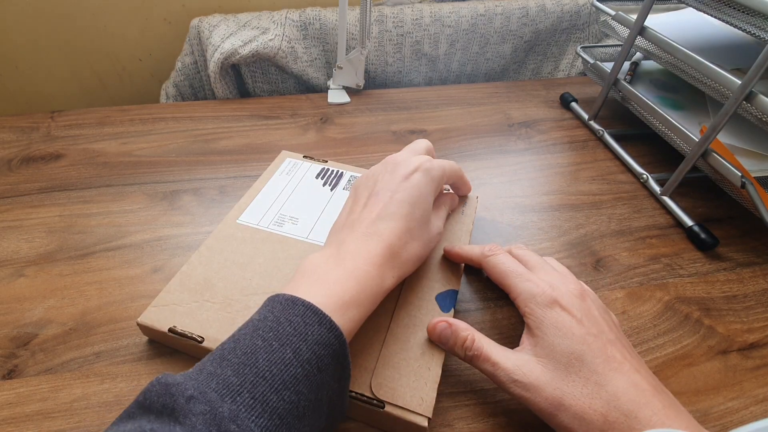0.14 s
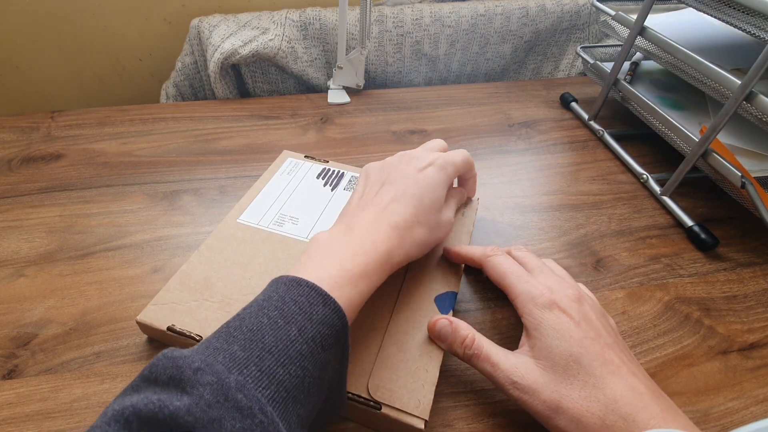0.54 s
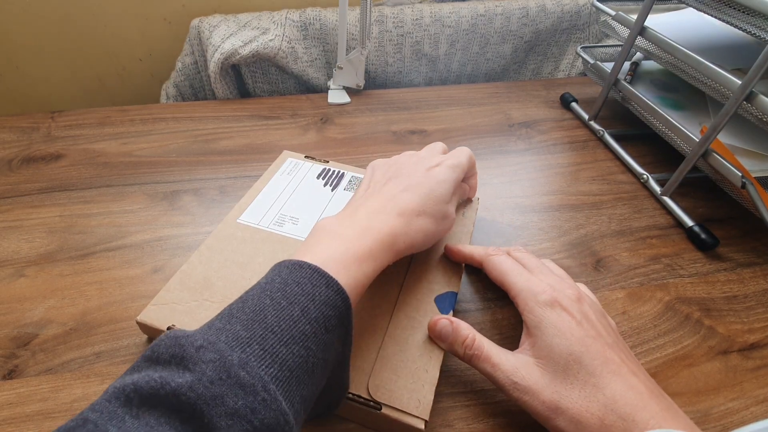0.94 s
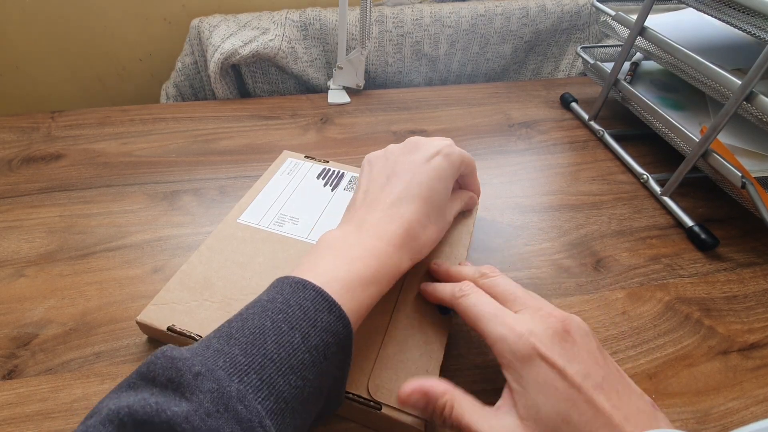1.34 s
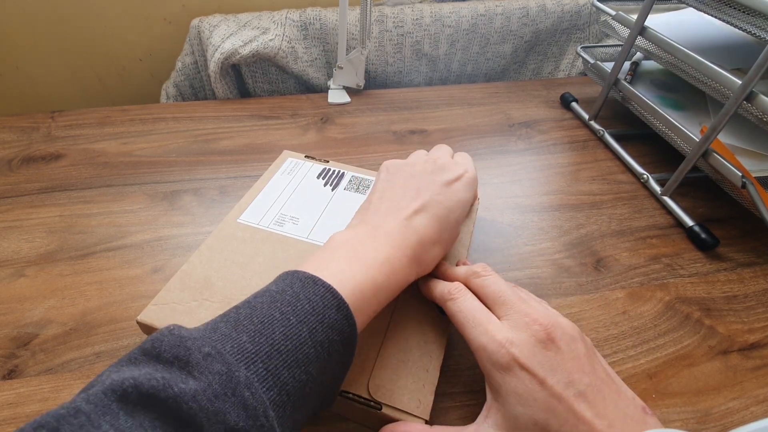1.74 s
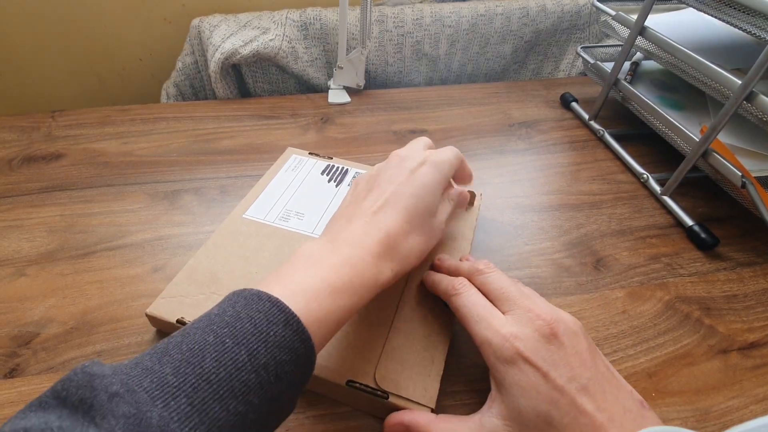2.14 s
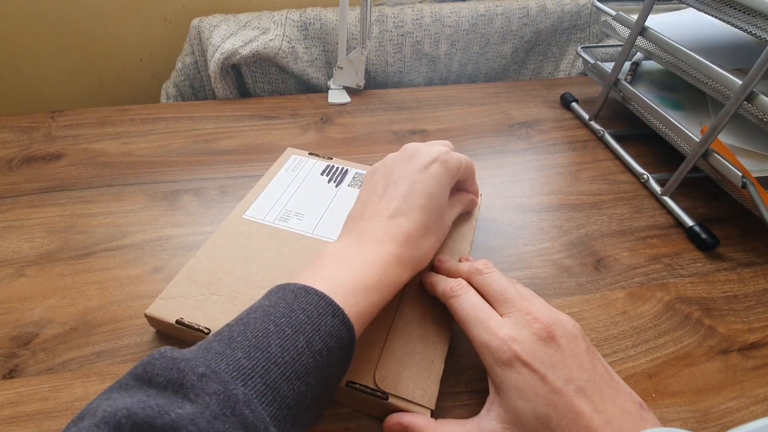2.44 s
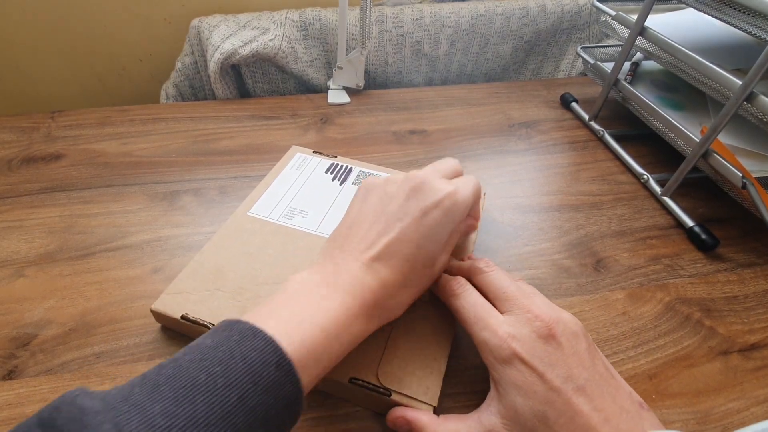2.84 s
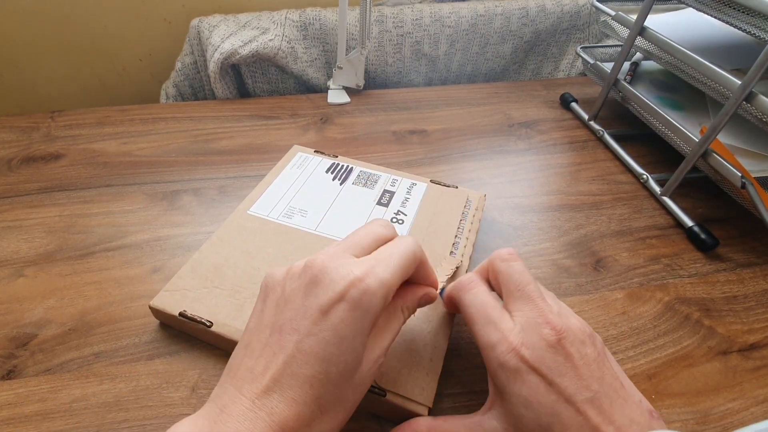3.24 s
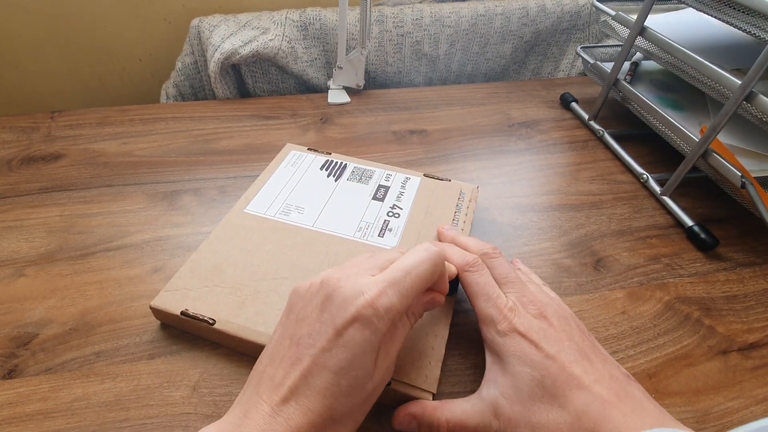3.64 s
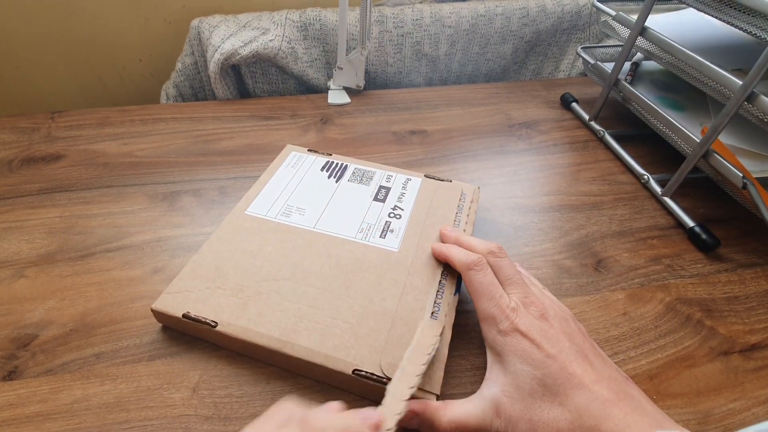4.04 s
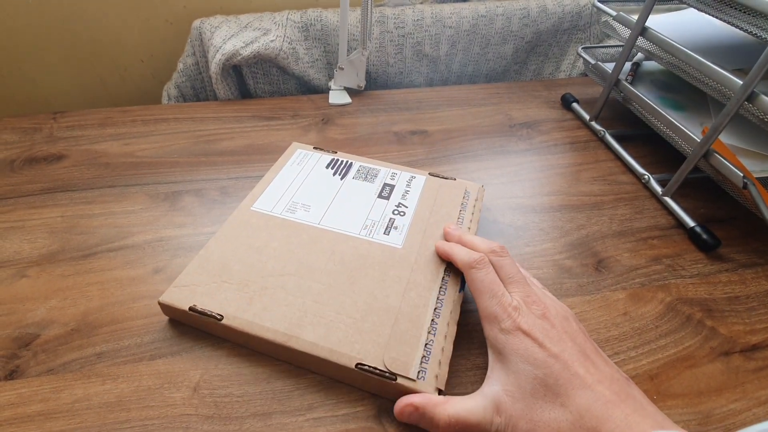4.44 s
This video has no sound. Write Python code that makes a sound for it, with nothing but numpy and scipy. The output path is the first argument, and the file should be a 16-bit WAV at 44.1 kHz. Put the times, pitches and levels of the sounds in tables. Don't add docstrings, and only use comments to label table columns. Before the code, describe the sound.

Close stereo pickup in a small soft room with faint hiss and hum. A thin airy finger slide on paper, then sparse nail ticks, scuffs and soft hollow taps on a cardboard mailer. A sudden rapid ripping burst follows, then a quieter rustling regrip, and a second, louder rip of crunchy snaps with low desk knocks, ending in near silence.

```python
import sys
import numpy as np
from scipy import signal
from scipy.fft import rfft, irfft, next_fast_len
from scipy.io import wavfile
from scipy.ndimage import uniform_filter1d

SR = 44100
rng = np.random.default_rng(int(sys.argv[2]) if len(sys.argv) > 2 else 0)


def generate_wav(sig):
    pcm = np.round(np.clip(np.atleast_2d(sig).T, -1, 1) * 32767).astype(np.int16)
    wavfile.write(sys.argv[1], SR, pcm)


def boost_factor(decibels):
    exponent = np.asarray(decibels, float) / 20
    return 10 ** exponent


N = 202727
T = np.arange(N) / SR
FIRST_PULL = (T > 2.72) & (T < 3.2)
SECOND_PULL = T > 3.82
PULLING = FIRST_PULL | SECOND_PULL
LEAD_S = 0.012

# t/s, strength/dB, hollow's extra answer/dB, paper skin's extra/dB, cluster length/s
PULL_1 = [(2.749, -32, 0.5, -4.5, 0.014), (2.79, -25.5, -7, -14, 0.0064), (2.796, -31, 0, 1.5, 0.004),
          (2.835, -30, -2, -2, 0.017), (2.87, -18.5, -2, -6, 0.0049), (2.921, -30, 8, 3, 0.0085),
          (2.949, -32, 8, -6, 0.0069), (2.985, -27.5, -7, 2, 0.0058), (3.007, -20, -18, -7, 0.0061),
          (3.036, -22.5, 0, -5.5, 0.011), (3.057, -31, -9, -23, 0.0038), (3.082, -23, 4, -1.5, 0.007),
          (3.091, -17, -32, -12.5, 0.0023), (3.107, -20, -10, -16, 0.0024), (3.132, -19, -8, -7.5, 0.0091)]
PULL_2 = [(3.834, -28.5, -11, 5.5, 0.0066), (3.858, -31, -22, 1.5, .0064), (3.886, -22.5, -33, 2, 0.0056),
          (3.915, -34, 1, 9, 0.0031), (3.963, -17.5, -17, 1.5, 0.0048), (4.006, -18, -18, 1.5, 0.006),
          (4.048, -14, -2, -2.5, 0.007), (4.084, -12.5, 0.5, -4, 0.0052), (4.113, -16, 2, -4, 0.007),
          (4.149, -10.5, -8, -6.5, 0.0041), (4.179, -14.5, -12, -2.5, 0.0075),
          (4.187, -20.5, -9, -6, 0.0034), (4.214, -11, 1.5, -8, 0.0041), (4.228, -22, -1.5, -2, .005),
          (4.242, -16, 1, 0, 0.0054), (4.264, -15, -13, -8, 0.011), (4.277, -12.5, -1, -10, 0.0028)]
# t/s, strength/dB, hollow's extra/dB, skin's extra/dB, tab pitch f/Hz
PICKS = [(.384, -68, 20.5, 1, 1640), (.496, -57.5, 13.5, -5, 4170), (0.617, -64, -12, 5.5, 3550),
         (.641, -42, -31, -8, 3400), (0.661, -47, -25, -5, 3400), (1.03, -59.5, -22, -6, 5000),
         (1.065, -46.5, -30, -12, 1900), (1.311, -49, 3.5, -17, 3600), (1.46, -60, 15, -14, 3420),
         (1.619, -49.5, -25, -19, 3200), (1.651, -46, 4, -2, 3100), (1.707, -52, 18, -10, 1800),
         (1.745, -68.5, 34.5, -3, 1730), (1.763, -52, 3, 0, 2900), (1.794, -56, -20, 2, 3010),
         (1.832, -59, -20, 1, 4500), (1.898, -31, -5.5, 1, 2420), (1.98, -51, -18, -6, 3000),
         (2.032, -39, -7, -9, 2020), (2.06, -50, -1, -14, 1890), (2.103, -62, 16, -11, 3380),
         (2.254, -66, 2, -20, 1700), (2.313, -47.5, -2, 2.5, 4400), (2.364, -51, 5, -3, 1740),
         (2.508, -69, 35, -4, 1680), (2.62, -61.5, 11, -3, 1600)]
TUGS = [
    (2.713, -44.5, -4, 2.5, 4130),
    (3.588, -45.5, -3, -9.5, 1460),
    (3.693, -58, -23, 9, 1410),
    (3.794, -57, -1, 12, 1530),
    (4.567, -59.5, 3.5, -13, 6500),
    (4.575, -65, 22, -6, 1290),
    (3.75, -66, -5, 6, 3000),
]
# f/Hz, width/Hz, level/dB
DESK_MODES = [(121.2, 32.5, -1), (150, 35, -1.5), (258.4, 27, -3.5), (393, 230, -3)]

# t/s, strength/dB, extra of each part/dB, cluster length/s
PICK_BREAKS = [(s, db, dict(panel=0, hollow=depth, fizz=fray), 0.0018) for s, db, depth, fray, _ in PICKS + TUGS]
PULL_1_BREAKS, PULL_2_BREAKS = (
    [(s, db, dict(panel=0, hollow=depth, fizz=fray), run) for s, db, depth, fray, run in pull]
    for pull in (PULL_1, PULL_2))


def evened(x):
    return x / np.sqrt(np.mean(x ** 2) + 1e-20)


def read(points, hz):
    f, value = np.transpose(points)
    return np.interp(np.log(hz + 1), np.log(f + 1), value)


def shaped(x, points, factor=1.):
    size = next_fast_len(N)
    gain = boost_factor(factor * read(points, np.fft.rfftfreq(size, 1 / SR)))
    return irfft(rfft(x, size) * gain, size)[:, :N]


def pair(x, like):
    like = np.clip(like, 0, 1)
    return np.array([x[0], like * x[0] + np.sqrt(1 - like ** 2) * x[1]])


def resonate(x, hz, width):
    turn = np.exp(2j * np.pi * np.cumsum(hz * np.ones(x.shape[1])) / SR)
    r = np.exp(-np.pi * width / SR)
    low = signal.lfilter([1 - r], [1, -r], x / turn)
    low = signal.lfilter([1 - r], [1, -r], low)
    return evened((turn * low).real)


def air():
    # f/Hz, level/dB
    hiss_curve = [(24, -40), (40, -14), (392, 0), (770, -10), (1850, -25), (7000, -29), (16000, -45)]
    # f/Hz, width/Hz, level/dB
    hum_lines = [(198.1, 6.7, -70.5), (368, 5.5, -74.5), (6860, 600, -85.5), (12900, 150, -100)]
    # t/s, level/dB
    gate_curve = [
        (0, 4),
        (.6, -3),
        (.85, -4.5),
        (1.05, -1),
        (2.4, 0.5),
        (4.35, 0.5),
        (4.5, -8),
    ]
    hiss = evened(shaped(pair(rng.standard_normal((2, N)), 0.42), hiss_curve)) * boost_factor(-66.5)
    drone = np.zeros((2, N))
    for hz, width_hz, db in hum_lines:
        tone = 0.04 * np.cos(2 * np.pi * hz * T)
        drone += boost_factor(db) * resonate(pair(rng.standard_normal((2, N)), 0.94) + tone, hz, width_hz)
    return (hiss + drone) * boost_factor(np.interp(T, *np.transpose(gate_curve)))


def arms_db():
    # t/s, level/dB
    shaking = [(0.0, -66), (1.24, -87.5), (1.33, -64), (1.88, -67.5), (1.9, -55.5), (2.22, -72),
               (2.71, -77.5), (2.8, -42), (2.95, -54), (3.16, -43), (3.26, -64), (3.82, -71), (3.86, -42.5),
               (4.0, -59.5), (4.05, -47.5), (4.23, -56), (4.26, -45), (4.59, -99)]
    return np.interp(T, *np.transpose(shaking))


def rumble():
    noise = pair(rng.standard_normal((2, N)), 0.96)
    return resonate(noise, hz=49.0, width=29) * boost_factor(1.5 + arms_db())


def slide():
    # f follows t; t/s, f/Hz, level/dB
    glide = [
        (0, 14200, -66.5),
        (.07, 14500, -58.5),
        (.16, 13600, -59.5),
        (.19, 12900, -65),
        (.24, 13900, -66),
        (.3, 11900, -65.5),
        (.38, 9600, -77),
        (.41, 9000, -90),
    ]
    # f/Hz, width/Hz, level over the whistle/dB
    skin_bands = [(3900, 360, -22), (4800, 430, -16), (6720, 620, -9)]
    s, hz, db = np.transpose(glide)
    t = T[:SR // 2]
    noise = pair(rng.standard_normal((2, len(t))), 0.5)
    waver = 1 + 0.012 * evened(uniform_filter1d(rng.standard_normal(len(t)), 900))
    whistle = resonate(noise, np.interp(t, s, hz) * waver, width=1100)
    whistle *= boost_factor(2.0 * evened(uniform_filter1d(noise[0], 500)) - 6.5)
    whistle += sum(boost_factor(over_db) * resonate(noise, f, w) for f, w, over_db in skin_bands)
    return np.pad(whistle * boost_factor(np.interp(t, s, db, right=-200)), ((0, 0), (0, N - len(t))))


def room_tail(like):
    # f/Hz, T60/s
    decay_times = [(100, 0.27), (700, 0.25), (2500, 0.22), (8000, 0.21), (15000, 0.14)]
    taps = np.zeros((2, SR // 2))
    at = np.arange(160, SR // 2 - 20, 20) + rng.integers(0, 20, (2, (SR // 2 - 161) // 20))
    np.put_along_axis(taps, at, rng.choice([-1., 1.], at.shape), 1)
    hz, t, z = signal.stft(pair(taps, like), SR, nperseg=256)
    fade = boost_factor(-60 * t / read(decay_times, hz)[:, None])
    tail = signal.istft(z * fade, SR, nperseg=256)[1]
    return tail / np.linalg.norm(tail[0])


def heard(sound, part):
    likeness = dict(hollow=.97, panel=.72, fizz=.1, desk=.995)
    room_level = dict(hollow=-12, panel=-6.5, fizz=-6, desk=-10)
    like = likeness[part]
    direct = pair(sound, like)
    turn = 2 * np.pi * 3.7 * T
    wet = np.zeros((2, N))
    for share in (np.cos(turn), np.sin(turn)):
        wet += signal.oaconvolve(direct[:1] * share, room_tail(like ** 3), axes=1)[:, :N]
    return direct + boost_factor(room_level[part]) * wet


def body(modes, shift=1.):
    t = np.arange(2048) / SR
    hz, w, db = np.transpose(modes)[:, :, None]
    swell = boost_factor(db) * w ** 1.5 * t * np.exp(-np.pi * 1.5 * w * t)
    ring = (swell * np.cos(2 * np.pi * hz * shift * t)).sum(0)
    return ring / np.linalg.norm(ring)


def rings(rows, width_hz, over_db):
    out = np.zeros((2, N + 4000))
    u = T[:4000] * np.pi * width_hz
    for (s, db, hz), phase in zip(rows, rng.uniform(0, 2 * np.pi, (len(rows), 2, 1))):
        at = round((s - 1 / (np.pi * width_hz)) * SR)
        wave = np.cos(2 * np.pi * hz * T[:4000] + phase)
        out[:, at:at + 4000] += boost_factor(db + over_db) * u * np.exp(1 - u) * wave
    return out[:, :N]


def fibres(count, per_s, spread_db):
    size = boost_factor(spread_db * np.minimum(rng.exponential(1, count), 4))
    size = size * (rng.random(count) < per_s / SR)
    return evened(size) * (2. * rng.integers(0, 2, (2, count)) - 1)


def cluster(run, late):
    run = max(run, 0.0004)
    u = T[:2800] - LEAD_S - late
    creak = 0.19 * np.exp(np.minimum(u, 0) / (0.84 * run))
    u = np.maximum(u, 0)
    rise = np.clip(u / (0.27 * run), 0, 1) ** 1.45
    loose_ends = 0.16 * np.exp(-u / 0.022)
    return np.maximum(rise, creak) * (np.exp(-(u / run) ** 2) + loose_ends)


def breaks(rows, part, modes, wander, late=0., stretch=0.87, spread_db=4.0):
    out = np.zeros((2, N + 7000))
    for s, db, extra_db, run in rows:
        level = cluster(run * stretch, late)
        shift = 1 + wander * rng.uniform(-0.6, 1, (len(modes), 1))
        clicks = level * fibres(len(level), per_s=8000, spread_db=spread_db)
        ring = signal.fftconvolve(clicks, body(modes, shift)[None], axes=1)
        ring *= np.linalg.norm(level) / np.linalg.norm(ring, axis=1, keepdims=True)
        at = round((s - LEAD_S - 0.0006) * SR)
        out[:, at:at + ring.shape[1]] += boost_factor(db + extra_db[part]) * ring
    return out[:, :N]


def crackle(level, modes, wander, count=3):
    a, b = np.flatnonzero(level)[[0, -1]]
    out = np.zeros((2, N + 2048))
    drift = 2 * np.pi * np.cumsum(rng.uniform(0, 16, b - a)) / SR
    for k in range(count):
        share = np.cos((drift + 2 * np.pi * k / count) / 2) ** 2
        shift = 1 + wander * rng.uniform(-0.92, 1, (len(modes), 1))
        drive = level[a:b] * share * fibres(b - a, per_s=9000, spread_db=2.5)
        out[:, a:b + 2047] += signal.oaconvolve(drive, body(modes, shift)[None], axes=1)
    return out[:, :N] / np.sqrt(3 * count / 8)


def rubbing(part, patchy_db):
    # t of most pressure/s, rise/s, fall/s,
    # level/dB, brightness/dB
    strokes = [(.03, 0.14, 0.26, -70.5, 17), (.2, 0.036, 0.19, -67.5, 12.5), (.496, 0.06, 0.36, -69.5, 1.5),
               (0.695, 0.047, 0.077, -57.5, -2.5), (.93, 0.18, 0.079, -68, 2.5),
               (1.062, 0.079, 0.44, -63.5, 2), (1.26, 0.093, 0.15, -59, 5.5),
               (1.476, 0.032, 0.19, -56.5, -5), (1.654, 0.047, 0.029, -55, 0.5),
               (1.774, 0.095, 0.12, -61.5, 0.5), (1.943, 0.047, 0.1, -48, 0.5),
               (2.03, 0.033, 0.1, -52, -0.5), (2.1, 0.085, 0.059, -52.5, -13),
               (2.315, 0.017, 0.25, -60.5, 2.5), (2.494, 0.087, 0.024, -57, 1), (2.657, .06, 0.08, -72, 17),
               (.6, 0.09, .05, -73, 6), (1.385, 0.093, 0.072, -62, 5), (1.56, 0.089, 0.096, -66.5, -4),
               (3.18, 0.12, 0.093, -42.5, 4.5), (3.3, 0.2, 0.12, -52.5, 4), (3.1, 0.29, 0.3, -51, -18),
               (3.66, .05, .05, -64, -3), (3.52, 0.039, 0.053, -64, -23), (3.59, 0.027, 0.21, -62.5, -13),
               (3.69, 0.15, 0.093, -61.5, 8.5), (3.76, .03, 0.056, -69.5, 12.5),
               (3.81, 0.074, .05, -52.5, -6.5), (4.325, 0.04, 0.075, -44, 5), (4.575, 0.023, .06, -76.5, 3),
               (4.47, .1, 0.12, -74, 9.5), (3.42, 0.12, 0.11, -59.5, -8)]
    # t/s, tension level/dB, brightness/dB
    tension_1 = [
        (2.731, -59, 10),
        (2.8, -36.5, 1.5),
        (2.88, -43, 3),
        (2.93, -44.5, 13.5),
        (2.99, -43, 6),
        (3.04, -34.5, -1),
        (3.16, -40, 13.5),
    ]
    tension_2 = [
        (3.83, -60, 2),
        (3.9, -48.5, -5),
        (4.01, -50, 3),
        (4.06, -36, -8.5),
        (4.13, -43, -4),
        (4.18, -36.5, -7.5),
        (4.23, -36.5, -1.5),
        (4.3, -48, 6.5),
    ]
    # level over contact/dB, share of brightness (ratio)
    answers = dict(panel=(0.091, 0.), hollow=(-2.2, -0.84), fizz=(0.1, 0.84), desk=(-5, -0.2))
    clumps = evened(uniform_filter1d(rng.standard_normal(N), 500))
    over_db, share = answers[part]
    t = T[::64]
    s, rise, fall, db, bright_db = np.transpose(strokes)[:, :, None]
    away = np.maximum((s - t) / rise, (t - s) / fall)
    stroke_db = db + share * bright_db - 22.5 * away ** 1.37
    power = boost_factor(-94.5) ** 2 + (boost_factor(stroke_db) ** 2).sum(0)
    for s, db, bright_db in (np.transpose(tension_1), np.transpose(tension_2)):
        power += boost_factor(np.interp(t, s, db + share * bright_db, left=-200, right=-200)) ** 2
    return np.interp(T, t, np.sqrt(power)) * boost_factor(over_db + patchy_db * clumps - 4.5)


def thuds():
    # t/s, peak level/dB
    nudges = [
        (1.455, -52),
        (1.708, -51),
        (1.901, -47),
        (2.025, -40),
        (3.585, -49),
        (.36, -63),
        (2.506, -62),
        (3.251, -58),
    ]
    # t/s, peak level/dB, f/Hz
    jolts = [(2.7558, -32, 150), (2.8012, -41, 150), (2.875, -23, 140), (2.9, -27.5, 131),
             (2.9269, -23.5, 129), (2.953, -30, 170), (2.989, -22, 132), (3.0111, -22.5, 139),
             (3.0418, -24, 128), (3.0627, -34, 120), (3.084, -29.5, 120), (3.1098, -25, 150),
             (3.1367, -28, 120), (3.1574, -29.5, 160), (3.8979, -33.5, 120.6), (3.9249, -32.5, 140.3),
             (3.9706, -25.5, 150), (4.0118, -25.5, 161), (4.0539, -21, 285), (4.0892, -26.5, 125),
             (4.119, -23, 124.5), (4.154, -21, 270), (4.1835, -30.5, 159.4), (4.2214, -25, 139.8),
             (4.248, -33.5, 178), (4.0581, -26.5, 119.5), (4.2696, -30.5, 288)]
    slap = rings([(s - .002, db, 490 - hz) for s, db, hz in jolts], width_hz=308, over_db=-5.0)
    out = np.zeros(N)
    for s, db in nudges:
        ring = body(DESK_MODES, 1 + 0.092 * rng.uniform(-1.65, 1, (len(DESK_MODES), 1)))
        out[round(s * SR):][:len(ring)] += boost_factor(db) * ring / abs(ring).max()
    return np.array([out, out]) + rings(jolts, width_hz=136, over_db=0.0) + slap


def desk():
    # f/Hz, width/Hz, level/dB
    lid_modes = [(136, 27, 1.5), (170, 42, -3), (270, 92, 2.5), (415, 58, -3)]
    creak = boost_factor(-70 + 0.39 * (arms_db() + 63))
    rub = np.hypot(rubbing("desk", patchy_db=0.5), creak)
    freed = (T > 4.03) & (T < 4.27)
    wood = crackle(rub * ~freed, DESK_MODES, wander=0.069, count=2)
    lid = crackle(rub * freed, lid_modes, wander=0.11) * boost_factor(6.0)
    return thuds() + wood + lid


def fizz():
    # f/Hz, width/Hz, level/dB
    skin_modes = [(6434, 1900, 1.5), (8800, 2200, -1.5), (11520, 6000, 5), (13670, 8300, 1.5)]
    rows = PICK_BREAKS + PULL_1_BREAKS + PULL_2_BREAKS
    frays = breaks(rows, "fizz", skin_modes, wander=.22, stretch=1.3, spread_db=.4)
    rub = crackle(rubbing("fizz", patchy_db=2.0), skin_modes, wander=0.11, count=2)
    return frays + rub * np.where(PULLING, 1, boost_factor(-2.5))


def hollow():
    # f/Hz, width/Hz, level/dB
    open_modes = [(520, 140, -2), (639, 157, 1), (700, 100, -6.5)]
    knock_modes = [(480, 150, -4.5), (690, 230, -1), (820, 240, 3), (980, 300, -2)]
    # t/s, peak level/dB, f/Hz
    pops = [(2.7546, -29, 720), (2.7817, -30, 650), (2.7949, -26, 702), (2.8728, -16.5, 750),
            (2.9244, -21.5, 600), (2.9366, -28, 780), (2.9535, -21.5, 790), (2.9863, -15, 700),
            (2.998, -28, 780), (3.0102, -22.5, 550), (3.0393, -23, 790), (3.0602, -24, 653),
            (3.0874, -28, 680), (3.1075, -29, 700), (3.1354, -23.5, 570), (3.1556, -31, 880),
            (3.968, -25, 824), (4.0109, -25.5, 820), (4.0535, -15.5, 686), (4.0635, -25, 720),
              (4.088, -15.5, 520), (4.1105, -25, 590), (4.1186, -18.5, 630), (4.1309, -31, 610),
              (4.1547, -14.5, 492), (4.1859, -18.5, 893), (4.2027, -33, 663), (4.217, -21.5, 905),
              (4.2216, -24.5, 810), (4.2326, -24.5, 710), (4.2458, -14.5, 750), (4.2585, -29, 675),
              (4.2702, -16, 670), (4.2796, -13, 820), (4.3006, -37, 926)]
    finger_taps = [(1.4633, -51, 650), (1.6543, -48.5, 740), (1.71, -32.5, 787), (1.7203, -45.5, 720),
                   (1.7466, -43, 753), (1.9019, -36.5, 480), (1.951, -42.5, 820), (1.9624, -45, 796),
                   (2.0297, -43, 600), (2.0534, -43, 696), (2.0692, -48, 820), (2.0917, -40, 814),
                   (2.1042, -37.5, 790), (2.1143, -46, 784), (2.1281, -56, 716), (2.5095, -37.5, 770),
                   (2.5212, -52, 720), (3.1978, -36, 836), (3.2217, -36, 784), (3.2567, -41, 860),
                   (3.2798, -37, 760), (3.2949, -36.5, 487), (3.3078, -36, 750), (3.3246, -41, 690),
                   (3.3475, -34.5, 845), (3.3674, -36, 720), (3.5261, -49, 770), (3.8021, -46, 780)]
    out = breaks(PULL_1_BREAKS + PULL_2_BREAKS, "hollow", open_modes, wander=0.092,
                 late=0.0014, stretch=0.56) * boost_factor(-9.0)
    out += rings(pops, width_hz=352, over_db=0.5)
    out += breaks(PICK_BREAKS, "hollow", knock_modes, wander=0.011,
                  late=0.00103, stretch=0.35, spread_db=1.5) * boost_factor(-8.0)
    out += rings(finger_taps[:17], width_hz=235, over_db=0.9)
    out += rings(finger_taps[17:], width_hz=170, over_db=-8.0)
    rub = rubbing("hollow", patchy_db=2.0)
    out += crackle(rub * PULLING, open_modes, wander=0.11)
    out += crackle(rub * ~PULLING, knock_modes, wander=0.099, count=2) * boost_factor(-3.0)
    return out


def panel():
    # f/Hz, width/Hz, level/dB
    modes_1 = [(1690, 910, -4), (2510, 960, 5.5), (3240, 590, 2), (4520, 1100, -20)]
    modes_2 = [(1330, 250, -0.5), (2050, 260, -3.5), (2810, 710, 3.5), (3540, 700, -1), (4400, 440, -21.5)]
    flap_modes = [(1500, 550, -3), (2200, 580, -2), (3400, 1110, 4), (5600, 2600, -5)]
    seam_modes = [(3500, 310, 0), (4400, 900, -10)]
    # t/s, peak level/dB, f/Hz
    snaps = [(2.7909, -18, 3660), (2.7975, -30, 2250), (2.8723, -14, 2800), (2.8815, -23.5, 2930),
             (2.8907, -26, 3420), (2.9237, -24, 2300), (2.9525, -24, 1910), (2.9915, -18, 3450),
             (2.9983, -27.5, 3500), (3.0088, -12, 3340), (3.0168, -19, 2340), (3.0277, -25, 3160),
             (3.038, -15.5, 3140), (3.0421, -28, 3770), (3.0854, -21, 3300), (3.0906, -22, 3220),
             (3.1066, -26, 3280), (3.1094, -23, 3000), (3.1339, -18.5, 3530), (3.138, -23, 3400),
             (3.1443, -21, 3450),
             (3.8895, -21, 2780), (3.9644, -14.5, 2800), (4.0053, -17, 2400), (4.0079, -10.5, 2750),
               (4.0153, -16, 2600), (4.019, -18, 2560), (4.05, -14, 3030), (4.063, -19, 3700),
               (4.085, -14, 2180), (4.097, -21, 2710), (4.1148, -11.5, 2770), (4.1261, -16.5, 1280),
               (4.151, -11, 2810), (4.1838, -8.5, 2720), (4.1894, -15, 2510), (4.193, -14, 2570),
               (4.1985, -18.5, 3160), (4.202, -21, 2390), (4.2083, -21.5, 2870), (4.2151, -8, 2850),
               (4.2258, -25.5, 2130), (4.2286, -22, 2730), (4.2413, -12.5, 2960), (4.244, -12, 3110),
               (4.2576, -19.5, 3340), (4.263, -22.5, 2410), (4.2666, -12.5, 3060), (4.269, -15, 3580),
               (4.2764, -21, 3500), (4.2789, -11, 3050), (4.2851, -15.5, 2640)]
    flap_ticks = [(1.487, -45, 3300), (1.6468, -44, 3020), (1.9097, -42, 3750), (1.9161, -41, 2600),
                  (1.9413, -47, 1580), (3.214, -39, 2990), (3.2356, -51, 2720), (3.2676, -46, 3550),
                  (3.2962, -46, 3430), (3.3145, -45, 1330), (3.3284, -49, 2870), (1.1107, -50, 3990),
                  (1.4704, -49, 3430), (1.0705, -57, 2900), (3.8365, -20, 1470), (3.8405, -21, 1450),
                  (3.8605, -26, 1500), (3.8875, -21, 1450), (4.3434, -41, 1360), (4.355, -40, 3110),
                  (4.3718, -38, 2140), (4.577, -55, 5600), (4.581, -60, 4300)]
    taut = (T > 2.77) & (T < 2.915)
    rub = rubbing("panel", patchy_db=1.5)
    out = crackle(rub * ~PULLING, flap_modes, wander=0.32)
    for row, (*_, hz) in zip(PICK_BREAKS, PICKS + TUGS):
        out += breaks([row], "panel", [(hz, 900, 0), (hz * 1.5, 1800, -1)], wander=0)
    out += rings(snaps, width_hz=895, over_db=-1.0)
    out += rings(flap_ticks, width_hz=660, over_db=-2.5)
    out += breaks(PULL_1_BREAKS, "panel", modes_1, wander=0.091) * boost_factor(-3.5)
    out += crackle(rub * FIRST_PULL, modes_1, wander=0.24)
    out += crackle(rub * taut, seam_modes, wander=0.035, count=2) * boost_factor(-2.5)
    out += breaks(PULL_2_BREAKS, "panel", modes_2, wander=0.11) * boost_factor(-3.0)
    out += crackle(rub * SECOND_PULL, modes_2, wander=0.2)
    return out


def box():
    mix = heard(desk(), "desk") + heard(fizz(), "fizz") + heard(hollow(), "hollow") + heard(panel(), "panel")
    return signal.sosfilt(signal.butter(2, 75, "high", fs=SR, output="sos"), mix)


def scene():
    return air() + rumble() + slide() + box()


def low_pass(x):
    return signal.sosfilt(signal.butter(12, 16950, fs=SR, output="sos"), x)


def record(dry):
    # f/Hz, left over right level/dB
    left_lean = [(60, 2.5), (110, 2.5), (200, 2), (380, 3.5), (700, 5), (1290, 7), (2380, 2.5), (4400, 8),
                 (8120, 4), (15000, 4)]
    ports = shaped(dry, left_lean, np.array([[.5], [-.5]]))
    limited = 1.3 * np.tanh(ports / 1.3)
    edge = signal.firwin(511, 15800, window=("kaiser", 7), fs=SR)
    mix = signal.oaconvolve(limited, edge[None], "same")
    return low_pass(mix)


dry = scene()
out = record(dry)
generate_wav(out)
```